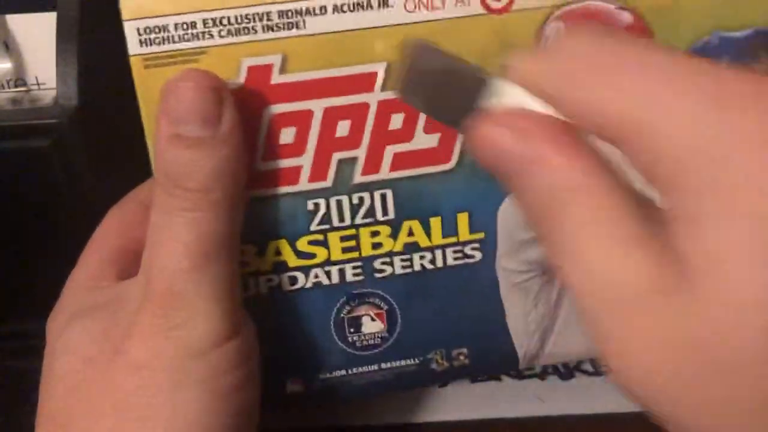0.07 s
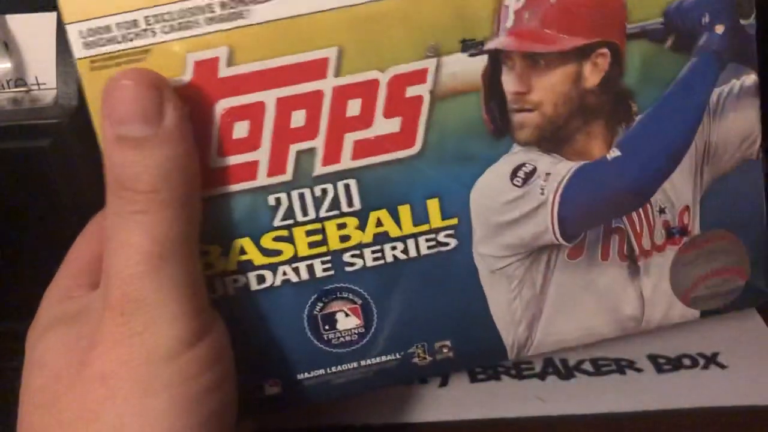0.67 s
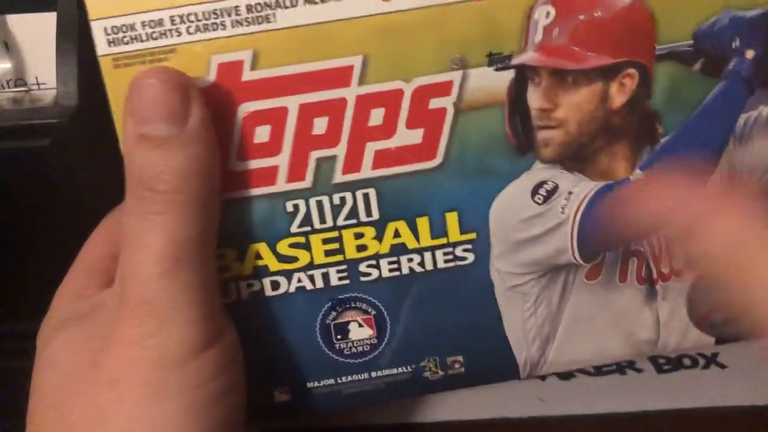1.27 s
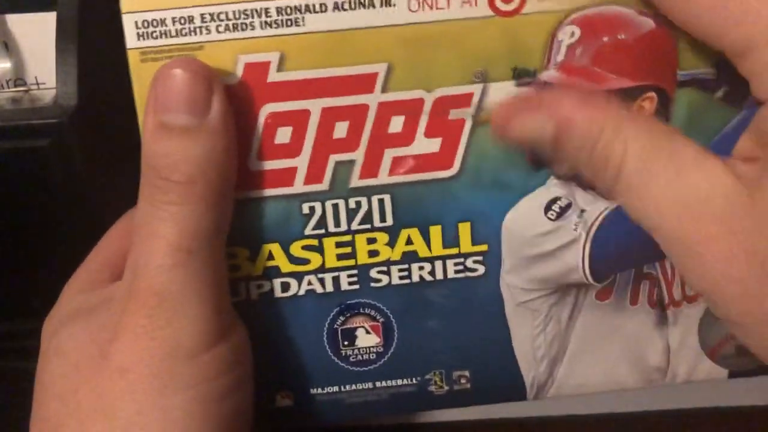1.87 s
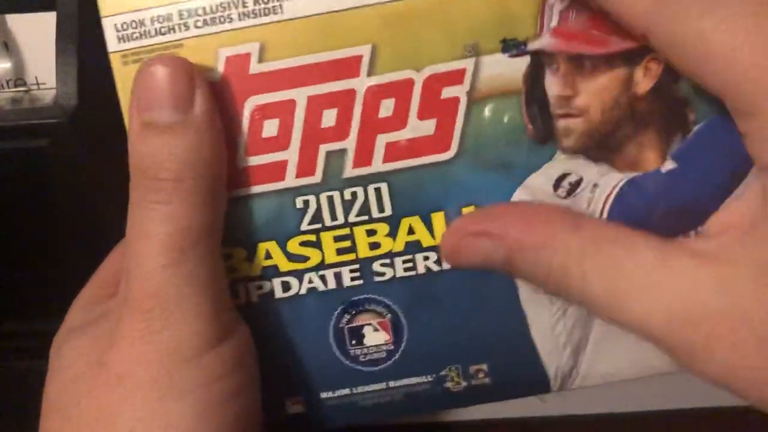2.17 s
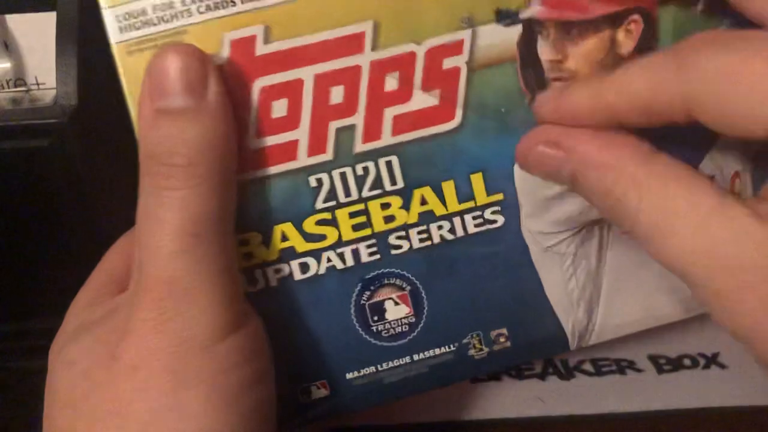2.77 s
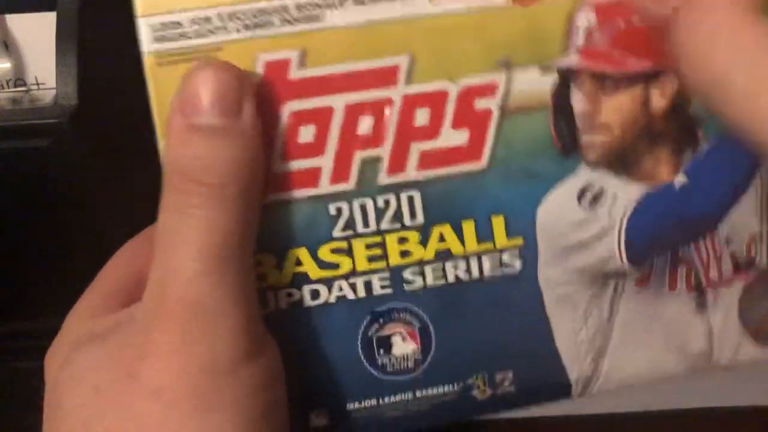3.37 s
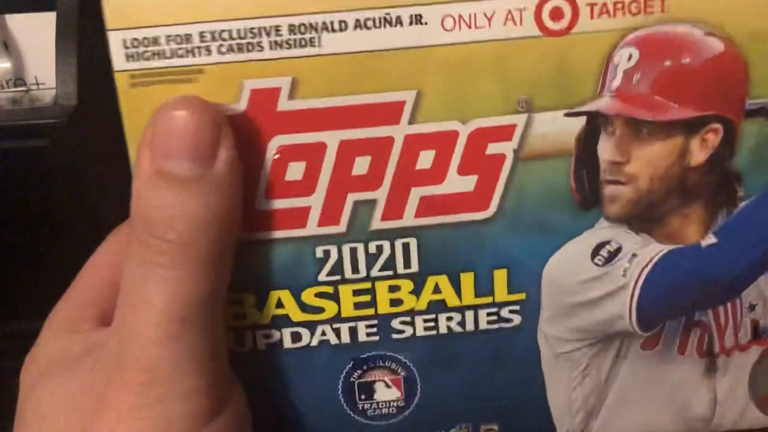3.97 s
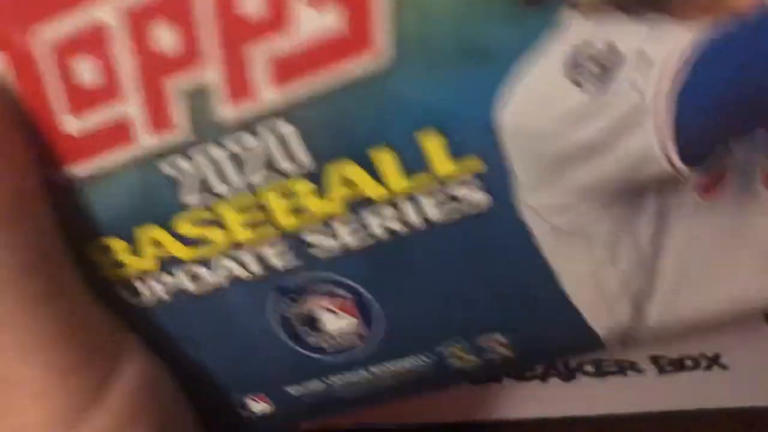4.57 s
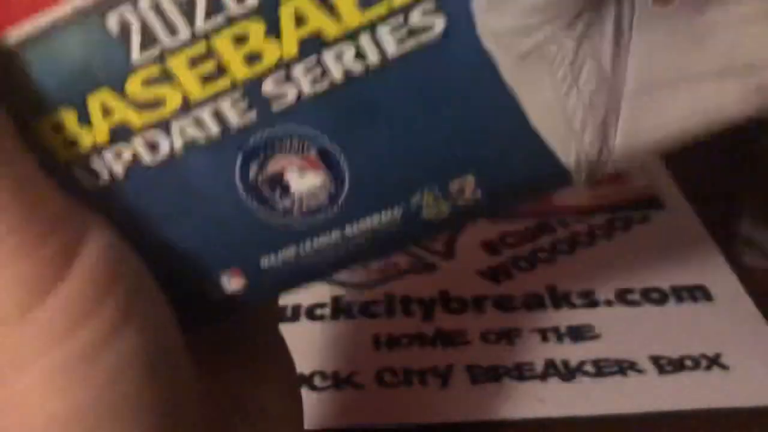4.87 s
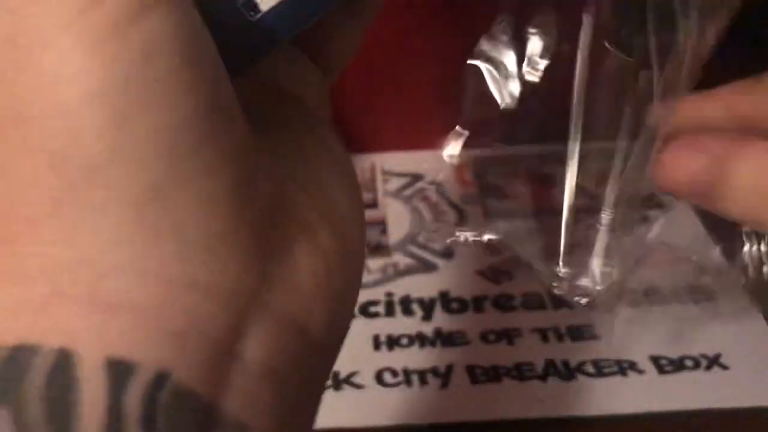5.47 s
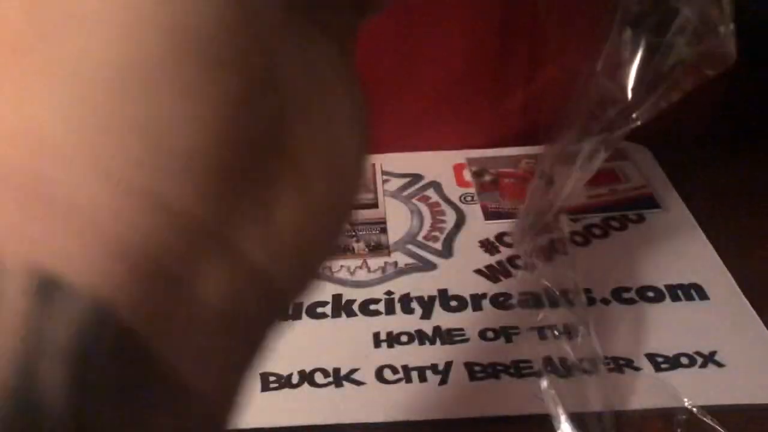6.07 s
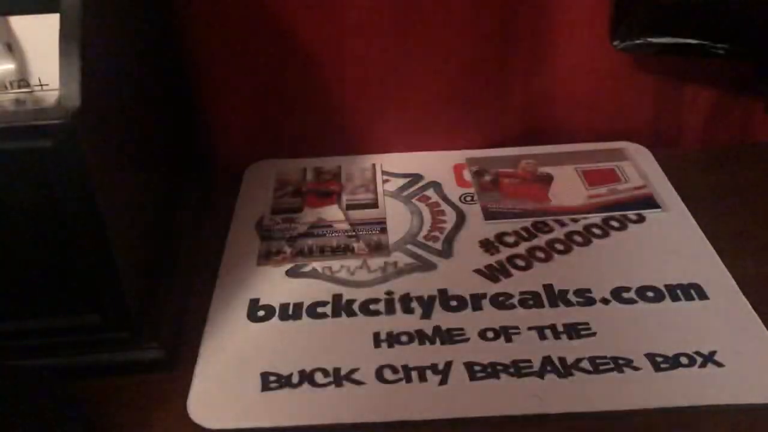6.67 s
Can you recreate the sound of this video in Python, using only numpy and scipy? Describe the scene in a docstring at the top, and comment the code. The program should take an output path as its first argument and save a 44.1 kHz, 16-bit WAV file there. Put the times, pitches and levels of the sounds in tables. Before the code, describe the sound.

Close up in a small furnished room with a faint hiss, shrink-wrap is taken off a cardboard box. A brief, soft scrape of a blade comes first, then several crisp cracks and sparse ticking as fingers work at the film. From about halfway the plastic is pulled off in uneven, bright crackles and snaps, with soft rubbing and dull bumps from the box, ending in a loose rustle.

```python
"""Shrink-wrap off a cardboard box

Close up, a blade slits the wrap with a fine rasp; fingers pick at the film, tear it off and crumple it.
Creases snap through, fine crackle runs between the snaps, skin rubs the lid and the hollow box
flexes with dull knocks. A small furnished room adds a short tail and a quiet hiss."""
import sys
import numpy as np
from scipy import signal
from scipy.fft import rfft, irfft
from scipy.io import wavfile
from scipy.ndimage import uniform_filter1d, map_coordinates

SR = 44100
rng = np.random.default_rng(int(sys.argv[2]) if len(sys.argv) > 2 else 0)


def materialize(psi):
    """Save the field psi as 16-bit PCM at rate SR to the path in sys.argv[1].

    A 1-D psi becomes a single channel; in a 2-D psi each row is a channel.
    """
    bounded = np.clip(np.atleast_2d(psi).T, -1, 1)
    quanta = np.round(bounded * 32767).astype(np.int16)
    wavfile.write(sys.argv[1], SR, quanta)


N = 296793
TIME = np.arange(N) / SR

# creases that snap through:
# (time [s], level over 4 ms [dB], brightness [dB], send into the cardboard [dB], facet pitch [Hz])
CREASE_SNAPS = [(0.107, -36, -15, 9, 1500), (0.1819, -46, 7, 7, 8900), (0.1964, -32, -8, -8, 1860),
                (0.2348, -45, 15, -6, 12200), (0.223, -43, -3, -6, 3250), (0.253, -41, 19, -28, 14000),
                (0.9101, -21.5, -7.5, -6.5, 3750), (0.914, -15, -14, -9, 2120),
                (1.0772, -11.5, 3.5, -14, 5400), (1.098, -29, 0, -2, 7340), (1.1185, -17, 3, -11.5, 5850),
                (1.139, -29, -4.5, -12, 5710), (1.4513, -44.5, -15, 8, 1610), (1.5535, -55.5, -7, 9, 1580),
                (1.614, -47, -4, -20, 8000), (1.64, -36, 4, -1, 14400), (1.6507, -33.5, 11, -34, 7900),
                (1.6795, -32.5, 0.5, -27, 10900), (1.7274, -40.5, 3, -4, 14410),
                (1.7519, -34, 2, -21, 2400), (1.763, -35, -1, -12, 10400), (1.7908, -38.5, 5, -29, 9400),
                (1.855, -40, 4.5, -10.5, 11800), (1.9924, -47.5, 5, 6.5, 1410),
                (2.0049, -44, 15, -15, 8360), (2.0485, -43, 14, -12, 7760), (2.0578, -34, 19, -9, 14300),
                (2.0888, -35, 14, -30, 10500), (2.123, -51.5, -3, 4.5, 9000), (2.2664, -35, -7, -32, 10000),
                (2.2956, -40, 10, -23, 10000), (2.3329, -31, 9.5, -17, 8400),
                (2.5889, -49, 13, -9.5, 12300), (2.7292, -39.5, -6, -4, 1720), (2.78, -46.5, 5, -30, 5650),
                (2.8417, -41, -5, -32, 9150), (2.889, -47.5, 7, -3, 3360), (3.079, -36.5, 4, -4.5, 12300),
                (3.1412, -12.5, 6, -18, 2530), (3.163, -21.5, 4, -22, 5900), (3.1764, -23, 9, -32, 9200),
                (3.2089, -22.5, -2, -4, 4860), (3.2914, -41.5, 4, -27, 3700), (3.324, -29, 0, -26, 10900),
                (3.3512, -40, 0, -31, 5040), (3.3639, -35, 3, -28, 3570), (3.3964, -45, -3, -17, 9860),
                (3.4689, -35.5, -14, -4, 1390), (3.5544, -28, 18, -33, 8800), (3.6683, -37.5, 9, -27, 4230),
                (3.7254, -34.5, 4, -4.5, 1430), (3.7737, -27.5, -2, -2, 4420),
                (3.8018, -27, -5, -10.5, 11800), (3.8333, -28.5, 6, -14, 13600),
                (3.8575, -41, 15, -24, 14490), (3.8724, -36, 21, -28, 13240),
                (3.8948, -34.5, -7, -12, 8300), (3.9662, -39, -5, -7.5, 6300),
                (3.9841, -40, -0.5, -11, 6140), (4.0135, -34.5, -6, -8, 10200),
                (4.0543, -41, 10, -17, 4280), (4.0859, -17.5, -2, -12.5, 5430),
                (4.1287, -34.5, 1, -1, 1630), (4.166, -34.5, -7, -18, 7400), (4.2052, -44, -14, 10.5, 1420),
                (4.2673, -40, 5, -17, 12810), (4.2823, -39.5, 4, -9.5, 3284), (4.3189, -40, 1, -10, 14320),
                (4.4152, -33, -13, -4, 1998), (4.4417, -14, 6.5, -6.5, 4480), (4.452, -30.5, -1, 1, 6340),
                (4.5756, -34.5, -19, -5, 4930), (4.589, -35.5, -11, -18, 10300),
                (4.6284, -34.5, 14, -9.5, 14000), (4.7391, -21, -4, -8, 7100),
                (4.7966, -30.5, -1, -2, 4940), (4.8395, -39, 8.5, -14, 12140),
                (4.8644, -29.5, 18, -14, 12200), (4.881, -33, 14, -21, 14490), (4.8934, -30, -2, -16, 5430),
                (4.9215, -12.5, 2.5, -9.5, 2980), (5.0445, -27.5, 2, -11.5, 4200),
                (5.1719, -15.5, 5, -12.5, 1770), (5.1817, -20, 11, -16, 14000),
                (5.1854, -24, 23, -28, 10900), (5.2093, -36, 10, -19, 10400), (5.2336, -27, 22, -30, 10700),
                (5.302, -29.5, -11, -30, 10660), (5.3411, -27.5, 14, -18, 14490),
                (5.4146, -33.5, 11, -16, 5190), (5.43, -37.5, -1, -13, 3090), (5.5023, -37, 0, -17, 1820),
                (5.5478, -33, -2, -12, 2730), (5.5753, -33.5, 8, -12, 2750), (5.6375, -34, -2, -22, 1870),
                (5.658, -29.5, 4, -40, 2980), (5.6698, -34.5, 4, -16, 3100),
                (5.7056, -31.5, 6.5, -40, 1930), (5.7149, -32.5, -7, -35, 9700),
                (5.7748, -42.5, -7, -17, 7100), (5.8584, -44.5, 1.5, 3.5, 14050),
                (5.8958, -50.5, -5, 12, 1550), (6.0212, -34, -3, 1, 6360), (6.114, -30, -13, -5, 10000),
                (6.148, -30.5, -2, -4.5, 3620), (6.1778, -17, -3.5, -17, 2600),
                (6.1846, -29, 15, -22, 11300), (6.2307, -25.5, 4, -7, 10200),
                (6.2552, -28.5, -17, -2, 10050), (6.3057, -28, -4, 0.5, 2280), (6.3521, -27, -3, -24, 9300)]
# each pull or stroke of the fingers: (start [s], length [s], crinkling [dB], its brightness [dB],
# rubbing on the lid [dB], jostling of the box [dB], swell from start to end [dB])
FINGER_PULLS = [(0.17, .1, -74, 0, -43, -49, -5), (0.347, .03, -72, 0, -54, -47.5, 5),
                (0.672, .033, -60.5, 1, -94, -85, 5), (0.782, .025, -62.5, -8, -79, -65, -4.5),
                (1.084, .07, -46, -9, -41, -46, -2), (1.398, .03, -96, 2, -63.5, -61, -6),
                (1.452, .022, -59.5, -15, -44.5, -47, -3.5), (1.654, .11, -61, 12, -53.5, -67, 5),
                (1.99, .1, -50, 2.5, -51.5, -51.5, 3.5), (2.199, .08, -53, 1, -47, -59, 6),
                (2.527, .065, -52, -1, -50, -49, -0.5), (2.733, 0.023, -66, -3, -49, -58, -2.5),
                (2.911, .2, -59, -5, -52, -76, 0.5), (3.149, .057, -34, 3, -42.5, -52.5, -1.5),
                (3.336, .035, -46, 6, -53, -57, -3), (3.468, .025, -44, 0, -45, -55, -3),
                (3.526, .07, -43, -2, -46.5, -57, -0.5), (3.731, .135, -42, 0, -46.5, -56, 2),
                (3.974, .08, -50, -1, -50, -55, 3), (4.088, .025, -37, -3, -39, -41.5, -3.5),
                (4.14, .05, -46, -2, -43.5, -52.5, -4), (4.338, .115, -41, -0.5, -46, -52.5, 14.5),
                (4.484, .03, -36.5, 2.5, -37.5, -51, 0.5), (4.565, .07, -43.5, 2, -50, -51, -7.5),
                (4.74, .02, -52, 0, -59, -55, -5), (4.797, .15, -46, 4, -47, -49.5, -3.5),
                (5.046, 0.087, -50.5, -4, -50.5, -59, 1.5), (5.176, .04, -30, 1, -38, -36, -8),
                (5.227, .095, -35.5, -2, -41, -52, -5), (5.398, .06, -47.5, -3, -52.5, -65, -8),
                (5.922, .065, -42.5, -1, -38, -62, 1), (6.177, .173, -37, 4.5, -40, -47, 0)]
# the wrap rustling between pulls, more as it comes loose: (time [s], level [dB])
LOOSE_RUSTLE = [(0, -71.5), (1.0, -71), (1.33, -88), (1.55, -68), (1.82, -58), (1.93, -69), (2.33, -57),
                (2.46, -72), (3.08, -61), (3.42, -76), (3.63, -53), (3.94, -66), (4.32, -58), (4.7, -66.5),
                (5.0, -66), (5.5, -47), (5.78, -63.5), (5.98, -44), (6.73, -44)]
# the bright tone of the film: (frequency [Hz], gain [dB])
FILM_EQ = [(300, -39), (900, -8.5), (1500, -3), (2000, -1.5), (2800, -0.5), (4000, 0), (5700, 1), (7500, 1),
           (9500, 1), (13000, -1), (16000, -4.5)]
# the duller tone of a snap passing through the lid: (frequency [Hz], gain [dB])
CARDBOARD_EQ = [(120, -14.5), (300, -10), (480, -7), (750, -4.5), (1000, -6), (1500, -6.5), (2500, -12),
                (6000, -27)]
# the blade's run along the lid: (time [s], level [dB], pitch of the resonances [ratio])
BLADE_STROKE = [(0.142, -77, 1.17), (.165, -53.5, 1.03), (0.212, -48, 0.93), (0.271, -45.5, 0.94),
                (0.359, -38.5, .97), (0.421, -42, 0.98), (0.433, -77, 0.81)]
# what the blade sets ringing in lid and film: (frequency [Hz], width [Hz], gain [dB])
BLADE_RESONANCES = [(575, 310, -1), (1380, 100, -1), (1970, 450, -6), (3380, 640, -3), (5500, 720, -12),
                    (6450, 650, -10), (8100, 4200, -16)]
# box panels flexing under fingers and film: (time [s], relative level [dB], centre [Hz])
PANEL_KNOCKS = [(0.1086, -18, 323), (0.111, -22, 136), (0.1297, -29, 460), (0.193, -37, 296),
                (0.2, -29.5, 690), (0.789, -44, 278), (0.9137, -30, 270), (1.0786, -20, 280),
                (1.078, -18.5, 930), (1.121, -27, 248), (1.4509, -28.5, 234), (1.462, -42.5, 158),
                (1.638, -33.5, 270), (1.639, -30.5, 720), (1.993, -33.5, 313), (2.054, -34.5, 322),
                (2.523, -35, 322), (2.561, -37, 188), (2.798, -31.5, 344), (3.4678, -26.5, 305),
                (3.474, -27, 126), (4.085, -31, 310), (4.0865, -24, 825), (4.442, -28, 575),
                (4.7393, -22.5, 986), (4.796, -28, 268), (4.8, -29, 127), (4.8919, -22, 246),
                (5.169, -23.5, 276), (5.1725, -17, 795), (5.175, -17, 136), (5.186, -31, 200),
                (5.935, -30, 71.6), (5.959, -25.5, 74), (6.179, -24.5, 437), (6.305, -27.5, 202)]
# the tone of skin sliding on the wrapped lid: (frequency [Hz], gain [dB])
RUB_EQ = [(120, -41), (300, -1), (430, 2.5), (570, 1.5), (800, -3.5), (1000, -4.5), (1250, -3),
          (1700, -11.5), (3000, -15.5), (6000, -31)]
# the low rumble of the box shifting in the hand: (frequency [Hz], gain [dB])
JOSTLE_EQ = [(30, -28), (70, -1.5), (130, -0.5), (250, -2.5), (400, -10.5), (800, -40.5), (2500, -34.5)]
# the ring of the hollow box: (frequency [Hz], t60 [s], gain [dB])
HOLLOW_MODES = [(251, .22, -7.5), (302.5, 0.72, -10), (600, 0.11, -13), (834, 0.1, -16), (990, 0.079, -18),
                (1758, 0.083, -7)]
# the room's decay: (frequency [Hz], t60 [s])
ROOM_DECAY = [(150, 0.38), (600, 0.23), (2500, 0.32), (6000, 0.3), (14000, 0.079)]
# the tone of the room's tail: (frequency [Hz], gain [dB])
ROOM_EQ = [(60, -12.5), (150, 3.5), (280, -3.5), (700, 1.5), (2000, -2), (5500, -1), (10000, -3.5),
           (16000, 10.5)]
# the room's steady noise floor: (frequency [Hz], gain [dB])
HISS_EQ = [(20, -26), (45, -7), (90, 0), (150, -3), (300, -10), (700, -19), (1500, -28), (4000, -33),
           (9000, -37), (16000, -42)]

TOP_HZ = 16100  # upper edge of the sound


def snaps(creases, facet_db=-4, facet_width_hz=700):
    """Creases crack in the film and chirp through the lid; returns the direct and the spread sound."""
    out = np.zeros((2, N))
    for start, db, bright_db, card_db, facet_hz in creases:
        slowness = undb(0.096 * (db + 24.0) - 0.34 * bright_db)  # large, slack creases flip slowly
        flip = ring(rise_s=0.000047 * slowness, decay_s=0.002 * slowness)
        all_round = flatten(flip)  # the sum of all the directions it radiates in
        pitched = unit(flip) + undb(facet_db) * unit(resonate(all_round, facet_hz, facet_width_hz))
        tap = colour(ring(rise_s=.0001, decay_s=0.0028), CARDBOARD_EQ)
        lid = burst(bend(tap, lag_s=0.001998), db + card_db)
        for path, shape in zip(out, (pitched, all_round)):
            crack = bend(brighten(colour(shape, FILM_EQ), bright_db), lag_s=0.000894)
            add(path, start, burst(crack, db) + lid)
    return out


def lesser_creases(crinkle_db, count=60, pitch_range_hz=(1840, 12900), card_db=-16.5):
    """Small creases give way at random, more often under hard handling; rows as in CREASE_SNAPS."""
    work = np.cumsum(np.interp(crinkle_db, [-66, -52], [0, 1]))
    at = np.searchsorted(work, work[-1] * (np.arange(count) + rng.random(count)) / count)
    size, tautness = rng.standard_normal((count, 2)).T
    db = crinkle_db[at] + 3 + 2 * size
    bright_db = 1 + 8 * tautness
    facet_hz = np.exp(rng.uniform(*np.log(pitch_range_hz), count))
    return np.column_stack([TIME[at], db, bright_db, np.full(count, card_db), facet_hz])


def crinkling(db, bright_db, partials=5, cluster_db=2, cluster_hz=70, tick_decay_s=.0008):
    """Lightly touched film slides with a soft hiss; pulled harder, countless tiny creases tick."""
    rate = 620 * undb(np.clip(0.51 * (db + 46), -8, 10))
    # ticks bunch up, as one crease sets off its neighbours
    clusters = np.interp(TIME * cluster_hz, np.arange(N), rng.standard_normal(N))
    sizes = crackle(rate * undb(cluster_db * clusters), spread_db=2.5) / np.sqrt(rate)
    # each tick is a puff of noise plus a few pitches of its own
    power = signal.lfilter([1], [1, -np.exp(-1 / (tick_decay_s * SR))], sizes ** 2)
    sizzle = np.sqrt(power) * rng.standard_normal(N)
    at = np.flatnonzero(sizes)
    age = np.arange(SR // 200) / SR
    pitches = 1300 * (TOP_HZ / 1300) ** (rng.random((len(at), partials)) ** 0.617)
    pings = sum(np.sin(2 * np.pi * hz[:, None] * age) for hz in pitches.T) * np.exp(-age / tick_decay_s)
    positions = at[:, None] + np.arange(len(age))
    ticks = np.bincount(positions.ravel(), (sizes[at, None] * pings).ravel(), N)[:N]
    crease_share = np.interp(db, [-66, -53], [.15, .97])
    creasing = np.sqrt(crease_share) * unit(unit(ticks) + unit(sizzle))
    sliding = np.sqrt(1 - crease_share) * rng.standard_normal(N)
    film = bend(colour(creasing + sliding, FILM_EQ), lag_s=0.000806)
    film = unit(shimmer(film, depth_db=2.7))
    return brighten(film, bright_db - 0.5) * undb(db + 1.2)


def slitting(rough_db=2):
    """The blade glides through the film with a fine rasp; the resonances drift as it crosses the lid."""
    times, db, pitch_ratio = np.transpose(BLADE_STROKE)
    grip = undb(rough_db * unit(uniform_filter1d(rng.standard_normal(N), size=150)))
    friction = grip * rng.standard_normal(N)
    scrape = sum((-1) ** k * undb(mode_db) * resonate(friction, hz, width)
                 for k, (hz, width, mode_db) in enumerate(BLADE_RESONANCES))
    playhead = np.cumsum(np.interp(TIME, times, pitch_ratio))
    drifting = map_coordinates(shimmer(scrape, depth_db=4.0), [playhead], order=3)
    return unit(drifting) * np.interp(TIME, times, undb(db), left=0, right=0)


def knocks(size=4096, trim_db=-4.0):
    """A box panel gives way with a low chirp and faint returns from its edges."""
    out = np.zeros(N)
    for start, db, centre_hz in PANEL_KNOCKS:
        push = signal.unit_impulse(size) + .035 * ring(rise_s=.002, decay_s=.007, size=size)
        octaves = np.log2(np.maximum(bins(push), 1) / centre_hz)
        width_octaves = min(1, 330 / centre_hz)  # small, stiff panels ring more clearly
        panel = irfft(rfft(push) / (1 + (octaves / width_octaves) ** 2) ** 2)
        knock = bend(panel, lag_s=0.002872) * np.linspace(1, 0, size)
        add(out, start, burst(knock, db + trim_db))
    return out


def rubbing(db):
    """Skin and film stick and slip on the lid."""
    slips = crackle(1500, spread_db=3.5) * rng.standard_normal(N)
    rub = bend(colour(slips, RUB_EQ), lag_s=0.001704)
    return unit(shimmer(rub, depth_db=3.5)) * undb(db - 1.5)


def jostling(db):
    """The hollow box shifts in the holding hand: a low rumble of tiny nudges."""
    nudges = crackle(900, spread_db=2.0) * rng.standard_normal(N)
    return unit(bend(colour(nudges, JOSTLE_EQ), lag_s=0.00297)) * undb(db + 0.5)


def hollow(x):
    """The air and panels of the box ring on briefly after whatever shakes it."""
    return sum(undb(db) * resonate(x, hz, np.log(1000) / (np.pi * t60)) for hz, t60, db in HOLLOW_MODES)


def room(x, tail_db=-12, build_s=0.0029):
    """The desk and near walls answer at once with a diffuse tail that loses its top end first."""
    t = np.arange(SR // 2) / SR
    noise, response = rfft(rng.standard_normal(len(t))), np.zeros(len(t))
    octave = np.log2(np.clip(bins(t), 125, 16000) / 125)
    for k in range(8):
        band = irfft(noise * np.maximum(1 - abs(octave - k), 0), len(t))
        t60 = along(ROOM_DECAY, 125 * 2 ** k)
        response += band * np.exp(-np.log(1000) * t / t60)
    build_up = 1 - np.exp(-(t / build_s) ** 2)
    response = colour(response * build_up, ROOM_EQ)
    return signal.fftconvolve(x, response * undb(tail_db) / np.sqrt(np.sum(response ** 2)))[:N]


def room_hiss(db=-60.5):
    """A quiet, steady bed of noise, weighted to the lows."""
    return unit(colour(rng.standard_normal(N), HISS_EQ)) * undb(db)


def hands(attack_s=.012, release_s=.016, slack_bright_db=-3):
    """Pulls grip, swell or slacken, and let go; returns dB curves: crinkle, brightness, rub, jostle."""
    t = TIME[::32]
    rustle_db = np.interp(t, *np.transpose(LOOSE_RUSTLE))
    hold_db = 0.53 * (rustle_db + 60.5)  # just holding the box rubs and jostles it, following the rustle
    power = undb([rustle_db, hold_db - 64, hold_db - 65.5]) ** 2  # rows: crinkle, rub, jostle
    weighted_bright = power[0] * slack_bright_db
    for start, length, db, bright_db, rub_db, jostle_db, swell_db in FINGER_PULLS:
        edges = np.maximum(start - t, 0) / attack_s + np.maximum(t - start - length, 0) / release_s
        progress = np.clip((t - start) / length, 0, 1)
        effort = np.exp(-edges) * undb(swell_db * (progress - .5))
        pull = np.outer(undb([db, rub_db, jostle_db]), effort) ** 2
        power += pull
        weighted_bright += pull[0] * bright_db
    crinkle, rub, jostle = 10 * np.log10(power)
    return [np.interp(TIME, t, curve) for curve in (crinkle, weighted_bright / power[0], rub, jostle)]


def ring(rise_s, decay_s, size=2048):
    """A buckle bounces between folds or edges: a short, dense ring of noise."""
    t = np.arange(size) / SR
    return rng.standard_normal(size) * (1 - np.exp(-t / rise_s)) * np.exp(-t / decay_s)


def crackle(per_second, spread_db):
    """Tiny slips at random moments; most are faint, a few stand out."""
    slips = rng.random(N) < per_second / SR
    sizes = undb(spread_db * np.minimum(rng.exponential(size=N), 4))
    return slips * sizes


def bend(x, lag_s):
    """Bending waves are slower at low pitch, so clicks become falling chirps; lag_s scales the smear."""
    hz, reference_hz = bins(x), 1000
    cycles = lag_s * (2 * np.sqrt(hz * reference_hz) - hz * np.sqrt(reference_hz / TOP_HZ))
    return irfft(rfft(x) * np.exp(-2j * np.pi * cycles), len(x))


def brighten(x, bright_db, split_hz=6000):
    """Tilt the balance about the split: taut film is bright, slack film dull."""
    low = signal.sosfiltfilt(signal.butter(2, split_hz, fs=SR, output="sos"), x, padtype=None)
    top_gain = undb(bright_db)
    return (low + top_gain * (x - low)) * np.sqrt(2 / (1 + top_gain ** 2))


def shimmer(x, depth_db, step_s=.035, step_hz=650, size=512):
    """The film keeps changing shape, so its resonances come and go."""
    hz, times, spectra = signal.stft(x, SR, nperseg=size)
    patches = rng.standard_normal((128, 1024))
    grid = np.meshgrid(hz / step_hz, times / step_s, indexing="ij")
    drift = map_coordinates(patches, grid, order=3, mode="mirror")
    return signal.istft(spectra * undb(depth_db * drift), SR, nperseg=size)[1][:N]


def flatten(x):
    """Even out the spectrum of a short sound, keeping its attack and fading its tail."""
    spectrum = rfft(x)
    contour = np.sqrt(uniform_filter1d(abs(spectrum) ** 2, size=5) + 1e-12)
    return irfft(spectrum / contour, len(x)) * np.linspace(1, 0, len(x)) ** 4


def resonate(x, hz, width_hz):
    """One resonance, gain 1 at its centre."""
    return signal.lfilter(*signal.iirpeak(hz, hz / width_hz, fs=SR), x)


def colour(x, eq, size=2048):
    """Minimum-phase EQ through points of (frequency [Hz], gain [dB])."""
    cepstrum = irfft(np.log(undb(along(eq, bins(np.zeros(size))))))
    cepstrum[1:size // 2] *= 2
    cepstrum[size // 2 + 1:] = 0
    return signal.fftconvolve(x, irfft(np.exp(rfft(cepstrum))))[:len(x)]


def along(points, hz):
    """Read a curve on a logarithmic frequency axis."""
    point_hz, value = np.transpose(points)
    return np.interp(np.log(np.maximum(hz, 1)), np.log(point_hz), value)


def bins(x):
    """Frequencies of the spectrum of x."""
    return np.arange(len(x) // 2 + 1) * SR / len(x)


def undb(db):
    """Decibels to gain."""
    return 10 ** (np.asarray(db) / 20)


def unit(x):
    """Scale to rms 1."""
    return x / np.sqrt(np.mean(x ** 2))


def burst(x, db, window_s=.004):
    """Give a short sound the energy of this level held for window_s."""
    return x * undb(db) * np.sqrt(window_s * SR / np.sum(x ** 2))


def add(out, start_s, x):
    """Mix x into out at its cue."""
    i = int(np.clip(start_s * SR, 0, N - 1))
    out[i:i + len(x)] += x[:N - i]


def scene():
    """Film and box up front, with sends to the hollow of the box and the room, over a steady hiss."""
    crinkle_db, bright_db, rub_db, jostle_db = hands()
    hiss = room_hiss()
    box = jostling(jostle_db) + knocks()
    cracks = snaps(CREASE_SNAPS) + snaps(lesser_creases(crinkle_db))
    film = slitting() + rubbing(rub_db) + crinkling(crinkle_db, bright_db)
    direct, spread = cracks + film
    return (direct + box + hollow(spread + 0.41 * box) + room(spread + box) + hiss)[None]


def record(dry):
    """The microphone rounds the tallest peaks and cuts the top."""
    rounded = np.tanh(dry)
    return signal.sosfilt(signal.ellip(10, .2, 70, TOP_HZ, fs=SR, output="sos"), rounded)


dry = scene()
out = record(dry)
materialize(out)
```